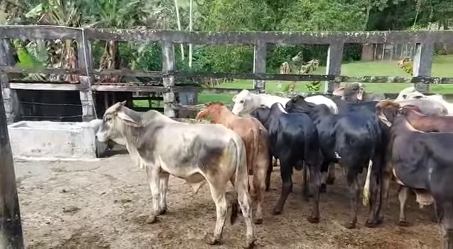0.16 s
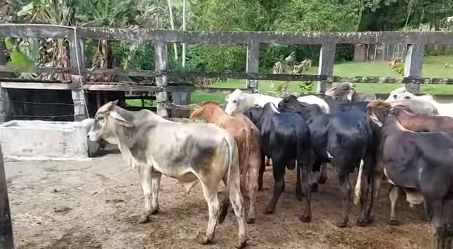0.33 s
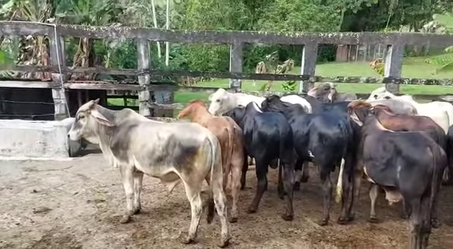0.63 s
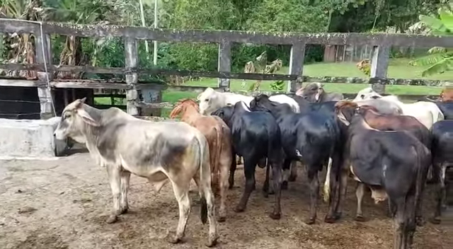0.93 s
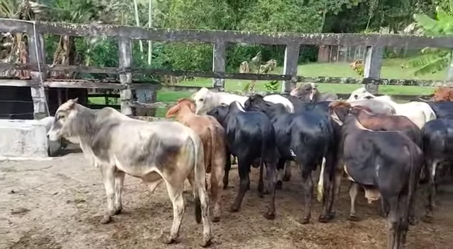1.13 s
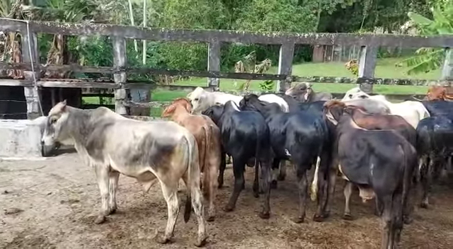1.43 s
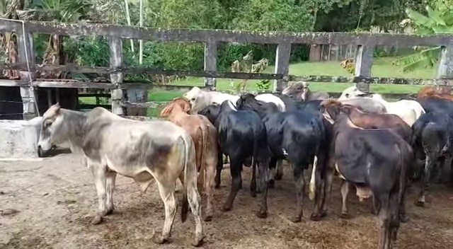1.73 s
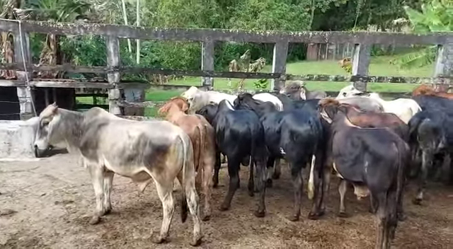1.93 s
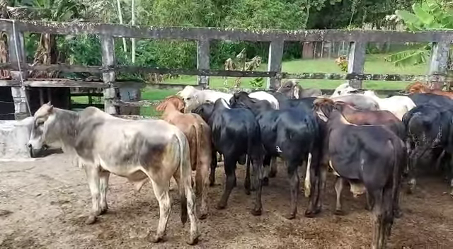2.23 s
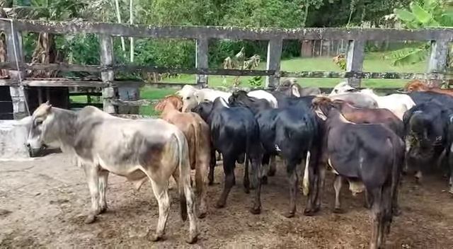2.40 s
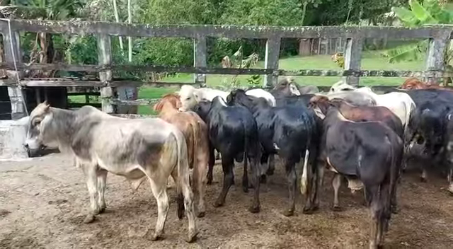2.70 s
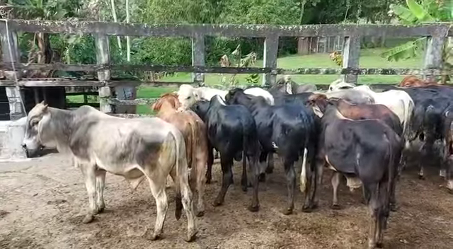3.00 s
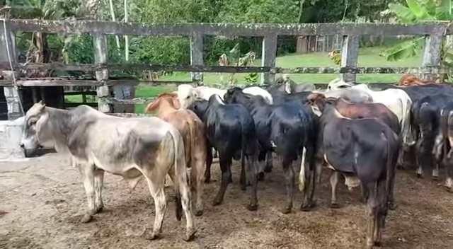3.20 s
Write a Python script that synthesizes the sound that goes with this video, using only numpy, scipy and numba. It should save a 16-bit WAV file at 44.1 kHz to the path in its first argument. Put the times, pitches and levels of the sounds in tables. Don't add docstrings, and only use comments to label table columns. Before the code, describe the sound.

A cow bellows once, hoarse and loud, in an open corral, then hooves shuffle on dirt.

```python
import sys
import numpy as np
from scipy import signal
from scipy.fft import rfft, irfft
from scipy.io import wavfile
from scipy.ndimage import uniform_filter1d, map_coordinates
from numba import njit

SR = 44100
rng = np.random.default_rng(int(sys.argv[2]) if len(sys.argv) > 2 else 0)


def inscribe(sig):
    pcm = np.round(np.clip(np.atleast_2d(sig).T, -1, 1) * 32767)
    wavfile.write(sys.argv[1], SR, pcm.astype(np.int16))


def convert_level_to_amplitude(level_db):
    exponent = np.asarray(level_db, float) / 20
    return 10 ** exponent


N = 147735


def rms_one(x):
    return x / np.sqrt(np.mean(x ** 2) + 1e-20)


def in_time(rows):
    s, *columns = np.transpose(rows)
    return [np.interp(np.arange(N) / SR, s, c) for c in columns]


def inside(start, end, fade):
    t = np.arange(N) / SR
    return np.clip(np.minimum(t - start, end - t) / fade, 0, 1)


def drift(rate):
    knots = rng.standard_normal(400)
    return map_coordinates(knots, [np.arange(N) / SR * rate], order=3, mode="wrap")


def cut(x, hz, kind, order=2):
    return signal.sosfilt(signal.butter(order, hz, kind, fs=SR, output="sos"), x)


def noise(*shape):
    return rng.standard_normal(shape)


def both_sides(pan_db):
    return np.array([[pan_db], [-pan_db]]) / 2


@njit
def resonate(x, w, r):
    y = np.zeros(len(x))
    for i in range(2, len(x)):
        y[i] = (1 - r * r) / 2 * (x[i] - x[i - 2]) + 2 * r * np.cos(w[i]) * y[i - 1] - r * r * y[i - 2]
    return y


def tract(x, peaks, stretch):
    flicker_db, flicker_per_s = 1.8, 22
    out = 0
    for hz, width, db, share in peaks:
        w = 2 * np.pi * hz * (1 + share * stretch) / SR
        r = np.exp(-np.pi * width / SR)
        gain = convert_level_to_amplitude(db + flicker_db * drift(flicker_per_s))
        out = out + gain * resonate(resonate(x, w, r), w, r)
    return out


def coloured(spectrum, patchy_db, white):
    octave = np.log2(np.fft.rfftfreq(N, 1 / SR) + 1)
    at, db = np.transpose(spectrum)
    shaped = rfft(white) * convert_level_to_amplitude(np.interp(octave, np.log2(at), db, left=-40))
    total = 0
    for mid in np.arange(4.5, 15, .5):
        band = irfft(shaped * np.clip(1 - 2 * abs(octave - mid), 0, 1), N)
        total = total + convert_level_to_amplitude(patchy_db * drift(15)) * band
    return rms_one(total)


# time_s, pitch_hz, level_db
FOLDS = [
    (0.099, 150.6, -53),
    (0.179, 156.1, -49),
    (0.239, 164.4, -50.5),
    (0.34, 171.1, -42),
    (0.723, 170.5, -46.5),
    (0.862, 168.8, -46.5),
    (0.969, 144.7, -59.5),
    (1.051, 138.5, -44),
]
# time_s, roughness_0_to_1
ROUGH = [
    (0, .9),
    (.13, .65),
    (.2, .1),
    (.33, .12),
    (.39, .62),
    (.8, .75),
    (1.0, .88),
    (1.3, 1),
]


def vibrate_folds():
    jitter, shimmer_db, halving_db, breath_db = .3, 3.5, 2.5, 0
    pitch, line_db = in_time(FOLDS)
    rough, = in_time(ROUGH)
    phase = np.cumsum(pitch) / SR
    at = np.flatnonzero(np.diff(np.floor(phase)))
    draw = noise(800, 2)[:len(at)]
    late = (0.005 + rough[at] ** 2 * jitter) * draw[:, 0] * SR / pitch[at]
    moved = np.clip(at + late, 0, N - 1).astype(int)
    pulses = np.zeros(N)
    pulses[moved] = convert_level_to_amplitude(rough[at] * shimmer_db * draw[:, 1] + halving_db * (-1) ** np.arange(len(at)))
    breath = noise(N) * (1 + 0.51 * np.cos(2 * np.pi * phase))
    source = pulses * np.sqrt(SR / pitch) * (1 - .5 * rough) + rough * convert_level_to_amplitude(breath_db) * breath
    source = source / np.sqrt(uniform_filter1d(source ** 2, size=2500))
    line = np.sqrt(2) * convert_level_to_amplitude(line_db) * np.sin(2 * np.pi * phase)
    return source, breath, line * inside(FOLDS[0][0], FOLDS[-1][0], .04)


# time_s, pitch_hz, level_db
HUM = [
    (.38, 262, -42),
    (.43, 262, -36),
    (.6, 266, -37),
    (.72, 272, -35),
    (.88, 292, -33),
    (.97, 266, -24),
    (1.062, 265, -19),
    (1.095, 265, -32),
    (1.22, 262, -38),
]


def hum():
    hz, db = in_time(HUM)
    unsteady = np.clip((-20 - db) / 8, 0, 1)
    level = convert_level_to_amplitude(db + unsteady * 3 * drift(25.42))
    phase = np.cumsum(hz + unsteady * 7 * drift(29.75)) / SR
    return np.sqrt(2) * level * np.sin(2 * np.pi * phase) * inside(HUM[0][0], HUM[-1][0], 0.045)


# time_s, level_db, mouth_stretch_share, chest_db, nasal_db
EFFORT = [
    (0, -20, 0.014, -6.5, 8.5),
    (.09, -27.5, -0.031, 6.5, -3.5),
    (.16, -21, 0.0017, -7.5, 9.5),
    (0.329, -19.5, -0.019, -11.5, 8),
    (.42, -20.5, -0.017, -7.5, 12.5),
    (.9, -19, -0.0104, -0.5, 4),
    (1.071, -18.5, 0.04, 3.5, 0),
    (1.189, -29, 0.015, 12, 10.5),
    (1.269, -42, 0.078, 8.5, -28),
]
# pitch_hz, width_hz, level_db, stretch_share
CHEST = [(279, 117, -9, 0.022), (563, 136, -11.5, 0.0012), (194, 54, -20, 0)]
THROAT = [(657, 110, -25.5, 1), (1049, 89, -1.5, 0.13), (960, 740, -21, 0.61), (1723, 207, -6, 1.64),
          (1549, 50, -8, 1.02), (1959, 72, -15.5, 1.8), (2266, 39.4, -13, 1.08), (2710, 100, -22.5, 1.6)]
MOUTH = [(530, 42, -2, 1)]
NASAL = [(908, 60, -3, 0)]
NOSE = [(3390, 140, 8, .2), (3850, 300, -1, -.3), (5020, 260, 3, .6), (6500, 500, -6, .5),
        (7800, 350, 1, -1), (12000, 6000, -14, 0)]
# time_s, stretch_share
JAW = [(0, -0.044), (.14, -0.0097), (.26, 0.019), (.55, -0.03), (.85, 0.0011), (1.25, 0.057)]
# time_s, level_db
RASP_SWELL = [(0, 2.5), (.12, -5.5), (.5, -4.5), (.85, -1), (.93, -0.5), (1.08, 1.5), (1.2, 2), (1.3, 14)]


def bellow():
    release_db_per_s, rasp_db, rasp_hz, lips_hz = 207, -28.5, 2640, 2950
    shake_db, shake_hz, shake_lump_db = -31, 110, 4
    end = EFFORT[-1][0]
    level_db, stretch, chest_db, nasal_db = in_time(EFFORT)
    level_db = level_db - release_db_per_s * np.maximum(np.arange(N) / SR - end, 0)
    source, breath, line = vibrate_folds()

    mouth = tract(source, THROAT, stretch) + tract(source, MOUTH, in_time(JAW)[0])
    mouth = mouth + convert_level_to_amplitude(nasal_db) * tract(source, NASAL, stretch)
    chest = convert_level_to_amplitude(chest_db) * tract(source, CHEST, stretch)
    body = (mouth + chest) / np.sqrt(np.mean(mouth ** 2))
    body = cut(cut(body, 162.5, "high", order=4), lips_hz, "low", order=6)

    hiss = rms_one(cut(tract(breath, NOSE, stretch), rasp_hz, "high"))
    rasp = convert_level_to_amplitude(rasp_db + in_time(RASP_SWELL)[0] + 1.5 * drift(15.06)) * hiss
    voice = convert_level_to_amplitude(level_db) * (body + rasp) + line + hum()

    low = rms_one(cut(noise(2, N), [45, shake_hz], "band"))
    shake = convert_level_to_amplitude(shake_db + shake_lump_db * drift(38.2)) * low
    return voice, convert_level_to_amplitude(level_db / 2 - 12.5) * inside(-1, end, 0.043) * shake


# time_s, level_db
INHALE = [
    (1.6, -62),
    (1.66, -53),
    (1.72, -46),
    (1.77, -44),
    (1.85, -49),
    (1.87, -66),
]
# pitch_hz, width_hz, level_db, stretch_share
INHALE_TRACT = [(320, 300, -21, 0), (965, 100, -3, 0), (1100, 130, -12, 0), (1800, 500, -26, 0),
                (2300, 400, -30, 0)]


def inhale():
    db, = in_time(INHALE)
    air = rms_one(tract(noise(N), INHALE_TRACT, np.zeros(N)))
    return convert_level_to_amplitude(db + 2.0 * drift(50.1)) * air * inside(INHALE[0][0], INHALE[-1][0], 0.078)


def place(x):
    pan_db, lag_s = 3.2, .00045
    return np.array([np.roll(x, int(round(lag_s * SR))) * convert_level_to_amplitude(pan_db / 2), x * convert_level_to_amplitude(-pan_db / 2)])


# pitch_hz, extra_phase_rad
PORT_PHASE = [(430, 0), (690, .9), (930, .6), (1040, -1.3), (1210, -.9), (1460, .8), (1720, -.1),
              (2840, -1)]


def ports(pair):
    wall_s, wall_db = (.22, .205), -30
    hz, rad = np.transpose(PORT_PHASE)
    turn = np.exp(1j * np.interp(np.fft.rfftfreq(N, 1 / SR), hz, rad))
    left = irfft(rfft(pair[0]) * turn, N)
    slap = np.array([np.pad(x, (int(s * SR), 0))[:N] for x, s in zip(pair, wall_s)])
    return np.array([left, pair[1]]) + convert_level_to_amplitude(wall_db) * cut(slap, 3200, "low")


def yard(x):
    t60_s, level_db, dull_hz, gap_s = .45, -9.5, 330, .003
    rails_db, rails_t60_s, rails_hz = 11, .04, 1300
    t = np.arange(SR) / SR
    tail = cut(noise(2, SR), dull_hz, "low", order=1) * convert_level_to_amplitude(-60 * t / t60_s)
    rails = convert_level_to_amplitude(rails_db - 60 * t / rails_t60_s) * cut(noise(2, SR), rails_hz, "high")
    tail = (tail + rails) * (t > gap_s)
    tail = tail / np.sqrt(np.sum(tail ** 2, axis=1, keepdims=True))
    return convert_level_to_amplitude(level_db) * signal.fftconvolve(x[None], tail, axes=1)[:, :N]


# start_s, peak_db, pitch_hz, left_over_right_db
THUDS = [(0.136, -33, 77.4, -14), (2.136, -47.5, 69.4, -14), (2.174, -43.5, 96, -24), (2.197, -45.5, 77, 4),
         (2.267, -46, 65.4, -11), (2.6, -42, 113, -11), (2.871, -50, 69.5, -3), (2.952, -52, 85, 11),
         (2.999, -55.5, 65, 13), (3.05, -53, 60, 15), (3.116, -40.5, 86, 8), (3.163, -36, 96, 0.5),
         (3.208, -53, 54.6, 15)]


def thuds():
    cycles, puff_db, puff_hz, puff_s = 2.75, -25, 484, 0.067
    out, t = np.zeros((2, N + SR)), np.arange(SR // 4) / SR
    for s, db, hz, pan_db in THUDS:
        i = int(s * SR)
        dust = rms_one(cut(noise(len(t)), [150, puff_hz], "band"))
        puff = convert_level_to_amplitude(puff_db) * dust * np.exp(-t / puff_s)
        swing = np.sin(2 * np.pi * hz * t) * np.minimum(t / 0.0042, 1) * np.exp(-t * hz / cycles * 1.87)
        swing = swing * [[1], [.1]]
        out[:, i:i + len(t)] += convert_level_to_amplitude(db + 5) * (swing + puff) * convert_level_to_amplitude(both_sides(pan_db))
    return out[:, :N]


# start_s, ring_db, crack_db
TICKS = [(2.174, -41, -52), (2.526, -33, -45.5), (2.6, -38.5, -58.5), (2.823, -42, -46), (2.847, -38, -47),
         (2.864, -49, -61.5), (2.872, -47, -49), (2.921, -41, -47), (2.93, -51, -44), (2.945, -33.5, -57),
         (2.971, -53, -45.5), (3.039, -58, -48.5), (3.052, -36.5, -48.5), (3.067, -55, -46),
         (3.122, -48, -44), (3.137, -44, -48.5), (3.162, -38, -53), (3.165, -52, -46.5), (3.17, -52, -44),
         (3.182, -59, -46.5)]
# pitch_hz, level_db, fade_by_60_db_s
TICK_MODES = [(700, 15, 0.0059), (1620, 8.5, 0.0079), (2220, -10, 0.0052)]


def stone_ticks():
    ring_trim_db, crack_trim_db, lag = -13, 6, 20
    out, t = np.zeros((2, N + SR)), np.arange(SR // 4) / SR
    for s, db, crack_db in TICKS:
        i, ring = int(s * SR), 0
        for hz, mode_db, t60 in TICK_MODES:
            a, b = noise(2)
            tone = np.sin(2 * np.pi * hz * (1 + 0.12 * np.tanh(b)) * t)
            ring = ring + convert_level_to_amplitude(mode_db + 3.2 * a) * tone * convert_level_to_amplitude(-60 * t / t60)
        crack = cut(noise(2, len(t)) * convert_level_to_amplitude(-60 * t / .004), 2000, "high")
        ring = cut(convert_level_to_amplitude(db + ring_trim_db) * ring, 350, "high")
        left, right = ring + convert_level_to_amplitude(crack_db + crack_trim_db) * crack
        out[0, i:i + len(t)] += left
        out[1, i + lag:i + lag + len(t)] += right
    return out[:, :N]


# start_s, length_s, level_db, left_over_right_db
SCUFFS = [
    (2.162, 0.047, -50, -1),
    (2.467, 0.025, -68, 4),
    (2.518, 0.086, -46.5, -7),
    (2.811, 0.086, -58.5, 7.5),
    (2.911, 0.069, -55.5, 3.5),
    (3.013, 0.068, -56.5, -4),
    (3.146, 0.066, -56, -2.5),
]
# pitch_hz, level_db
SCUFF_TONE = [(250, -11), (600, 4.5), (1100, 12.5), (2100, 2), (3200, -2), (6500, -10.5), (12000, -12.5),
              (16000, -12)]


def scuffs():
    grit_per_s = 4700
    sizes = convert_level_to_amplitude(3.6 * np.minimum(rng.exponential(1, N), 2))
    grains = (rng.random(N) < grit_per_s / SR) * noise(N) * sizes
    pair = np.array([grains, np.roll(grains, 20)]) + .5 * grains.std() * noise(2, N)
    stroke = 0
    for s, length, db, pan_db in SCUFFS:
        swell = np.sin(np.pi / 2 * inside(s, s + length, length / 2))
        stroke = stroke + convert_level_to_amplitude(db + both_sides(pan_db)) * swell
    return stroke * coloured(SCUFF_TONE, patchy_db=1.0, white=pair)


# time_s, level_db
STIR = [
    (1.2, -39),
    (1.5, -57.5),
    (1.85, -70.5),
    (1.95, -92.5),
    (2.08, -83.5),
    (2.25, -62),
    (2.7, -63.5),
    (3.1, -61),
    (3.35, -68),
]
# pitch_hz, level_db_per_hz
STIR_TONE = [(40, -9.5), (120, -8), (320, -1), (600, -11), (1200, -15), (3000, -37.5)]


def herd_stir():
    db, = in_time(STIR)
    white = noise(2, N) + 0.92 * noise(N)
    return convert_level_to_amplitude(db) * coloured(STIR_TONE, patchy_db=-0.5, white=white)


# pitch_hz, width_hz, level_db
INSECTS = [(6840, 860, -71)]
# start_s, end_s, pitch_hz, level_db
CHEEP = (2.135, 2.215, 4652, -66)


def far_life():
    hz, width, db = INSECTS[0]
    start, end, cheep_hz, cheep_db = CHEEP
    buzz = rms_one(cut(noise(2, N), [hz - width / 2, hz + width / 2], "band"))
    cheep = rms_one(cut(noise(N), [cheep_hz - 60, cheep_hz + 60], "band"))
    return convert_level_to_amplitude(db + 1.6 * drift(8.9)) * buzz + convert_level_to_amplitude(cheep_db) * cheep * inside(start, end, 0.017)


# pitch_hz, level_db_per_hz
AIR = [(30, 6), (120, -5.5), (400, -5.5), (1000, -5.5), (2500, -4), (4500, -5), (7000, -10), (15000, -13.5)]


def country_air():
    return convert_level_to_amplitude(-58.5) * coloured(AIR, patchy_db=1.2, white=noise(2, N))


def scene():
    voice, shake = bellow()
    cow = voice + inhale()
    call = ports(place(cow)) + yard(cow) + shake
    herd = thuds() + stone_ticks() + scuffs() + herd_stir()
    return call + herd + far_life() + country_air()


def top_cut(x):
    return signal.sosfilt(signal.butter(12, 15750, fs=SR, output="sos"), x)


def record(dry):
    return top_cut(dry)


dry = scene()
out = record(dry)
inscribe(out)
```